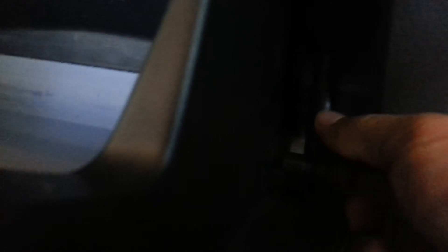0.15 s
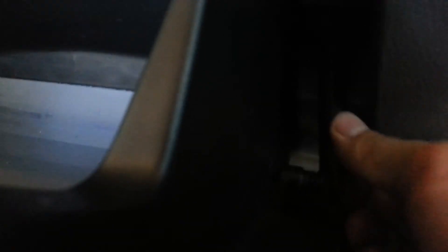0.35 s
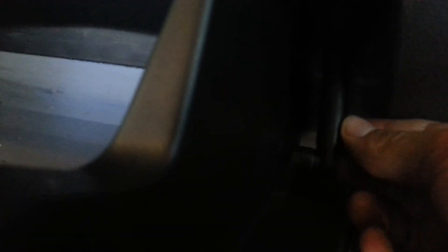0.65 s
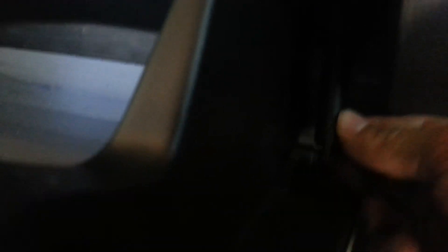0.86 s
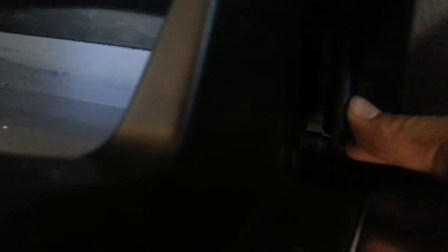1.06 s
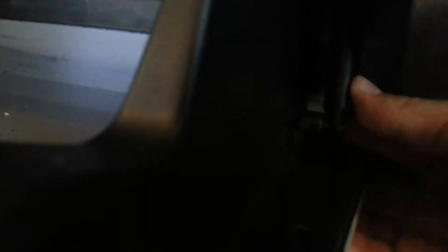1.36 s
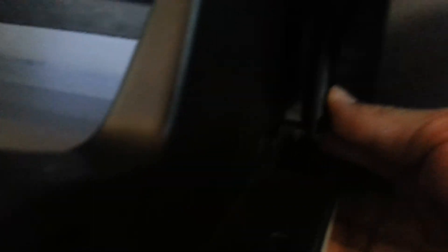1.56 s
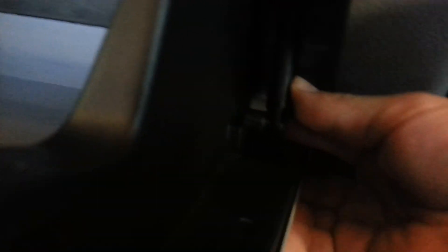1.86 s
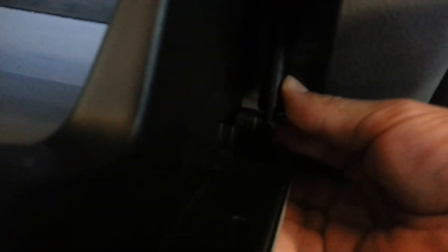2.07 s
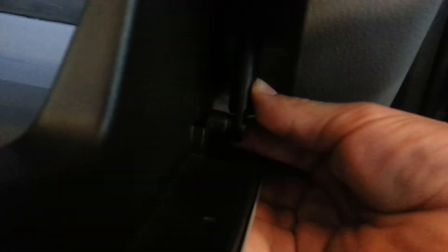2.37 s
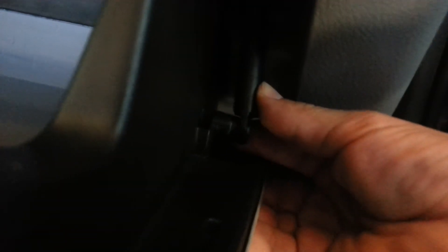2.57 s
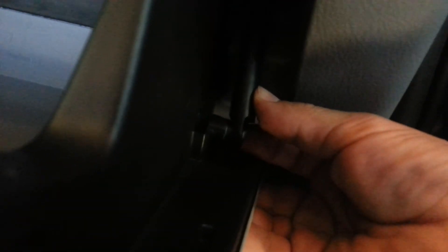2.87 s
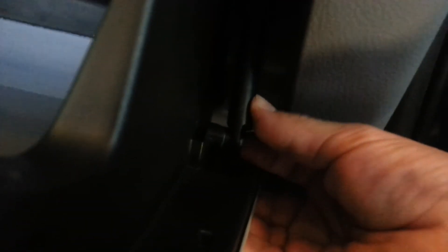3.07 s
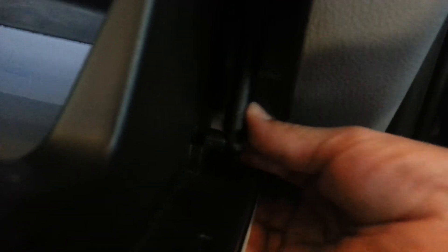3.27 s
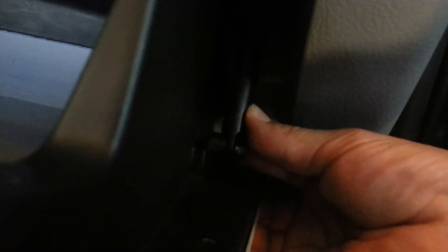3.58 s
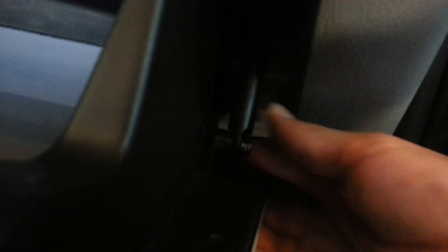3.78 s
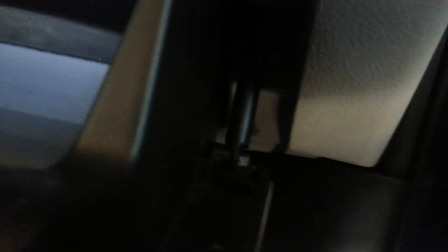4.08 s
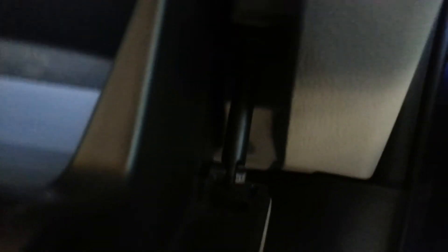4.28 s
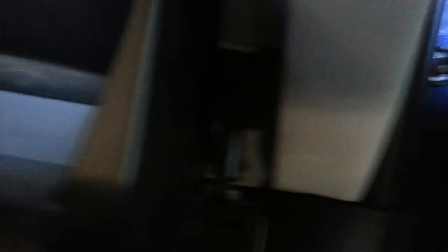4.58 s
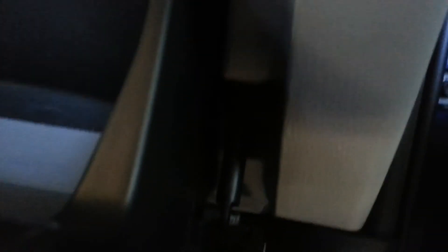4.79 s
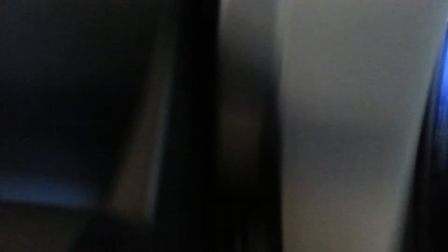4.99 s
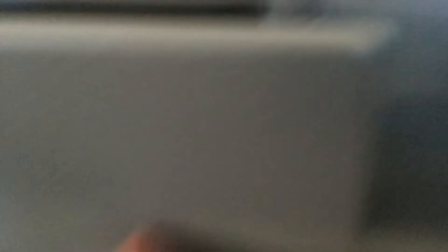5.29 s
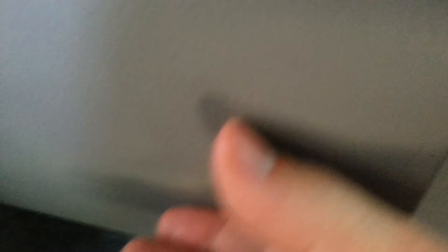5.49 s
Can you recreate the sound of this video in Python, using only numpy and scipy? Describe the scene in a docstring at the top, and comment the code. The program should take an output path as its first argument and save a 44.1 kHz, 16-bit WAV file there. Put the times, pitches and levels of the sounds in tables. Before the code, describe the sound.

Close plastic scrapes and small taps in a quiet parked car, one crisp click, then a booming, overloaded clunk as a bin seats.

```python
"""Glove box refitted in a parked car

A plastic glove box is worked back up into the dash of a quiet car, close to the microphone.
The bin scrapes and slides (hails of tiny stick-slip contacts) and rattles; its arm snaps on sharply.
Contacts ring decaying modes and filtered panel noise; the catch's double knock booms through the dash
and overloads the recorder, then loose parts buzz. Behind lie filtered-noise rumble and hiss,
with a swept sine hum and a few faint chirps."""
import sys
import numpy as np
from scipy import signal
from scipy.fft import rfft, irfft
from scipy.io import wavfile
from scipy.ndimage import uniform_filter1d

SR = 44100
rng = np.random.default_rng(int(sys.argv[2]) if len(sys.argv) > 2 else 0)


def store_wav(level_fs):
    """Save 16-bit WAV to argv[1]."""
    pcm = np.round(np.clip(np.atleast_2d(level_fs), -1, 1) * 32767)
    wavfile.write(sys.argv[1], SR, pcm.T.astype(np.int16))


N = 248724  # length in samples

# Cabin rumble and microphone hiss. Each row: frequency in Hz, relative level in dB per Hz.
FLOOR_COLOUR = [(15, -55.5), (25, -28), (41, -16), (108, -2), (141, -8), (246, -5.5), (377, -12),
                (443, -13.5), (533, -14), (660, -15), (4360, -26.5), (5400, -21.5), (7230, -27),
                (14400, -28)]
FLOOR_DB = -58
# Stereo width of the floor, then of the plastic. Each row: frequency in Hz, left-right correlation.
FLOOR_LIKENESS = [(40, 0.83), (150, 0.2), (600, 0.26), (2000, 0.05), (12000, .1)]
PLASTIC_LIKENESS = [(40, .4), (120, 0.13), (300, 0.99), (600, 0.53), (1500, 0), (12000, 0)]

# A faint low hum, like an engine gathering speed outside. Each row: time in seconds, pitch in Hz.
HUM_PITCH = [(1.8, 56.1), (2.36, 56.0), (3.94, 71.44), (4.36, 66.2), (5.4, 79.7), (5.64, 95.6)]
HUM_DB, HUM_OCTAVE_DB = -64, -73
# The fundamental only comes through once it climbs above this edge.
HUM_LOW_CUT_HZ, HUM_LOW_CUT_SLOPE = 64, 14
# Faint far chirps. Each row: start in seconds, length in seconds, start pitch in Hz, end pitch in Hz,
# level at the crest in dB.
CHIRPS = [(.39, .05, 5900, 6500, -71), (1.825, .075, 6200, 6900, -70), (3.76, .13, 1430, 1410, -70),
          (4.87, .09, 1550, 1480, -66), (5.46, .17, 1390, 1340, -70)]

# Plastic drags on plastic, lightly, then biting.
# Each row: start of the hold in seconds, hold in seconds, level in dB.
SCRAPES = [(.43, .15, -59.5), (.503, 0.036, -40.5)]
SCRAPE_SWELL_DB_PER_S, SCRAPE_FADE_DB_PER_S = 518, 620
# The hand pushes the bin along its guides.
# Each row: start of the hold in seconds, hold in seconds, level in dB.
PUSHES = [(0.01, 0.067, -54.5), (1.04, 0.29, -66), (2.79, 0.087, -54), (3.24, 0.98, -59), (4.2, .2, -46.5),
          (4.255, 0.011, -36), (4.41, 0.014, -39.5), (4.66, .32, -56)]
PUSH_SWELL_DB_PER_S, PUSH_FADE_DB_PER_S = 211, 151
# Loose parts are shaken by the catch and buzz until they come to rest.
SHUDDER_DB, SHUDDER_HOLD_S = -25, .035
SHUDDER_SWELL_DB_PER_S, SHUDDER_FADE_DB_PER_S = 5002, 139
# Colour of the rubbing and buzzing. Each row: frequency in Hz, relative level in dB per Hz.
SCRAPE_COLOUR = [(60, -25), (160, 0), (300, -3), (500, -8), (680, 2.5), (1040, -6), (1310, 5), (1600, -7.5),
                 (2210, -2), (3250, -13), (9000, -18.5), (14000, -28)]
SLIDE_COLOUR = [(60, -25), (120, -16), (206, 0), (320, -11), (437, -9), (536, -17), (658, -9), (790, -21),
                (1250, -19), (1550, -14), (2000, -22), (3300, -22), (6000, -34), (14000, -52)]
SHUDDER_COLOUR = [(40, -22), (65, -4), (130, -8), (260, 0), (600, -10), (830, -17), (1000, -13),
                  (1280, -21), (1570, -16), (2200, -20), (4500, -20), (6300, -29), (9000, -42),
                  (14000, -55)]

# Light touches of the loose bin. Each row: time in seconds, relative level in dB,
# treble edge of the contact in Hz, bass weight in dB, favoured frequency in Hz, left-minus-right pan in dB.
RATTLES = [(0.004, -34, 1520, 18, 330, -3.5), (0.045, -34, 785, 10.5, 380, -1),
           (0.271, -47.5, 5300, 10, 3330, -9), (0.461, -36, 3200, 9, 800, -1),
           (0.509, -39, 3500, 14.5, 1280, -9), (0.540, -34.5, 5000, 9, 1274, -1),
           (2.568, -49, 6000, -4, 4100, -10.5), (2.884, -34, 780, 7, 598, -5),
           (2.924, -38, 5000, -12, 4250, 4), (3.235, -33.5, 3650, 8.5, 1320, -6),
           (3.316, -42.5, 6270, 12.5, 2620, -5), (3.405, -42, 1900, 20.5, 496, -1),
           (3.469, -26.5, 1060, 5, 566, -4), (3.9678, -13, 3100, 6, 620, -5),
           (3.989, -16.5, 298, 5, 156, -3), (4.254, -25, 1000, 7.5, 206, -6.5),
           (4.298, -26.5, 480, 3.5, 211, -5.5), (4.689, -28.5, 2400, 15.5, 403, -0.5),
           (4.708, -32, 2980, 16, 3200, -1.5), (4.756, -39, 6930, -22, 5010, -13),
           (4.825, -30.5, 3200, 12.5, 407, 3), (4.848, -40.5, 2840, 18, 2180, -3),
           (4.873, -36.5, 2500, 13.5, 400, 2), (4.969, -36, 3090, 19.5, 3300, -1.5)]
# The arm snaps onto its peg. Each row: time in seconds, relative level in dB,
# treble edge in Hz, bass weight in dB, favoured frequency in Hz, left-minus-right pan in dB.
SNAP = [(2.7632, -17, 2500, -5.5, 1500, -1.5), (2.7643, 3.5, 9900, -6.5, 1920, -4),
        (2.7673, -12, 3000, 3.5, 380, -4)]
# The catch rides over its stop, the bin lands against the dash and rebounds softly.
# Each row: time in seconds, relative level in dB, treble edge in Hz, bass weight in dB,
# favoured frequency in Hz, left-minus-right pan in dB.
CATCH = [(4.4298, 19.5, 12000, -3, 3000, 0.75), (4.4348, 1.5, 1460, -3.5, 350, 0.068),
         (4.4523, 8.5, 14000, -3, 3500, 0.31), (4.4620, 10.5, 1500, 2.5, 250, -2.5),
         (4.531, -18, 500, 4, 330, -2)]
# Crowded modes of the plastic panels. Each row: frequency in Hz, relative level in dB per Hz.
PANEL_COLOUR = [(60, -31.5), (160, -8), (400, -2.5), (850, -3), (1400, -2.5), (2500, -5), (4500, -8.5),
                (8000, -24.5), (11000, -25.5), (15000, -22.5)]
# How long the panels ring. Each row: frequency in Hz, time to fall 60 dB in seconds.
PANEL_T60 = [(100, 0.31), (400, 0.11), (1200, 0.049), (4000, 0.04), (12000, 0.043)]
# The hanging bin. Each row: frequency in Hz, relative level in dB, time to fall 60 dB in seconds.
BIN_MODES = [(120, -34, .22), (159, -23.5, .22), (226, -25, .16), (260, -24, 0.32), (357, -14.5, 0.097),
             (413, -25, .1), (494, -25, .09), (629.6, -13, 0.1), (990, -21, .05), (1190, -9, 0.033),
             (1450, -5.5, 0.036), (2280, -6.5, .025), (2705, -7, 0.02)]
# The dash with the bin seated in it.
# Each row: frequency in Hz, relative level in dB, time to fall 60 dB in seconds.
DASH_MODES = [(38, -37, .15), (65, -35.5, 0.27), (117, -33, 0.22), (151, -20.5, 0.097), (194.3, -24, .16),
              (251.6, -6.5, 0.14), (358.4, -18, 0.33), (372.1, -4, .135), (462, -21.5, 0.11),
              (584, -15.5, .12), (617.6, -16, 0.08)]

CUTOFF_HZ = 14900  # top of the recorder's band


def from_db(db):
    """Decibels to gain."""
    return 10 ** (np.asarray(db) / 20)


def rms_one(x):
    """Scale to unit power."""
    return x / np.sqrt(np.mean(x ** 2) + 1e-20)


def in_time(rows):
    """A curve read at every sample."""
    return np.interp(np.arange(N) / SR, *np.transpose(rows))


def at_hz(points, hz):
    """A table read on a log-frequency axis."""
    table_hz, value = np.transpose(points)
    return np.interp(np.log(np.maximum(hz, 1)), np.log(table_hz), value)


def stereo(pair, alike):
    """Two unrelated noises become left and right with a given correlation."""
    middle = np.sqrt((1 + alike) / 2) * pair[0]
    side = np.sqrt((1 - alike) / 2) * pair[1]
    return middle + side * [[1], [-1]]


def coloured(noise, spectrum, likeness):
    """Give a pair of noises a spectrum and a left-right correlation; unit power."""
    hz = np.arange(N // 2 + 1) * SR / N
    pair = stereo(rfft(noise), at_hz(likeness, hz))
    return rms_one(irfft(pair * from_db(at_hz(spectrum, hz)), N))


def fade(energy, t60):
    """Stored energy leaks away by 60 dB in t60 seconds."""
    return signal.lfilter([1], [1, -np.exp(-np.log(1e6) / (t60 * SR))], energy)


def background(whine_hz, whine_width_hz, whine_db):
    """A steady low rumble, even hiss, and a narrow band of high hiss."""
    hz = np.arange(N // 2 + 1) * SR / N
    floor = from_db(FLOOR_DB) * coloured(rng.standard_normal((2, N)), FLOOR_COLOUR, FLOOR_LIKENESS)
    peak = 1 / (1 + (2 * (hz - whine_hz) / whine_width_hz) ** 2)
    whine = irfft(rfft(rng.standard_normal((2, N))) * peak, N)
    return floor + from_db(whine_db) * rms_one(whine)


def hum():
    """A gliding low tone with its octave; the fundamental is weak below the low-cut edge."""
    hz = in_time(HUM_PITCH)
    phase = 2 * np.pi * np.cumsum(hz) / SR
    passed = 1 / np.hypot(1, (HUM_LOW_CUT_HZ / hz) ** HUM_LOW_CUT_SLOPE)
    return from_db(HUM_DB) * passed * np.sin(phase) + from_db(HUM_OCTAVE_DB) * np.sin(2 * phase)


def chirps(waver_depth):
    """Short gliding tones with an unsteady pitch, each swelling and fading."""
    out = 0
    for start, length, from_hz, to_hz, level_db in CHIRPS:
        along = np.clip((np.arange(N) / SR - start) / length, 0, 1)
        waver = 1 + waver_depth * rms_one(uniform_filter1d(rng.standard_normal(N), size=200))
        pitch = (from_hz + (to_hz - from_hz) * along) * waver
        tone = np.sin(2 * np.pi * np.cumsum(pitch) / SR)
        out = out + from_db(level_db) * np.sin(np.pi * along) * tone
    return out


def outside(chirp_waver):
    """The hum and chirps together; root two turns their RMS levels into sine peaks."""
    return np.sqrt(2) * (hum() + chirps(chirp_waver))


def strokes(rows, swell_db_per_s, fade_db_per_s):
    """Each stroke swells, holds and fades; the strongest sets the level in dB."""
    t = np.arange(N) / SR
    levels = []
    for start, hold, level_db in rows:
        before = np.maximum(start - t, 0)
        after = np.maximum(t - start - hold, 0)
        levels.append(level_db - swell_db_per_s * before - fade_db_per_s * after)
    return np.max(levels, axis=0).clip(-200)


def slips(level_db, colour, per_s, spread_db, slip_t60):
    """Stick and slip: a hail of tiny uneven contacts rings in the plastic."""
    born = rng.random(N) < per_s / SR
    sizes = from_db(spread_db * rng.standard_normal(N))
    energy = fade(born * sizes ** 2 + 1e-18, slip_t60)
    grains = np.sqrt(energy) * rng.standard_normal((2, N))
    return coloured(grains, colour, PLASTIC_LIKENESS) * from_db(level_db)


def rubbing():
    """The bin scrapes briefly, then slides up its guides and shudders as it settles."""
    scrape_db = strokes(SCRAPES, SCRAPE_SWELL_DB_PER_S, SCRAPE_FADE_DB_PER_S)
    slide_db = strokes(PUSHES, PUSH_SWELL_DB_PER_S, PUSH_FADE_DB_PER_S)
    catch_stroke = (CATCH[0][0], SHUDDER_HOLD_S, SHUDDER_DB)
    shudder_db = strokes([catch_stroke], SHUDDER_SWELL_DB_PER_S, SHUDDER_FADE_DB_PER_S)
    scrape = slips(scrape_db, SCRAPE_COLOUR, per_s=1400, spread_db=2, slip_t60=.02)
    slide = slips(slide_db, SLIDE_COLOUR, per_s=1200, spread_db=2.5, slip_t60=.035)
    shudder = slips(shudder_db, SHUDDER_COLOUR, per_s=600, spread_db=2.5, slip_t60=.03)
    return (scrape + slide + shudder) * from_db([[-1.2], [1.2]])  # leans right


def loose_parts(gain_db, t60_at_1k, shortening):
    """The small part that is touched rings briefly at its own note; high notes die sooner."""
    out, t = np.zeros((2, N)), np.arange(SR // 4) / SR
    for s, level_db, _, _, hz, pan_db in RATTLES:
        t60 = t60_at_1k * (1000 / hz) ** shortening
        start = round(s * SR)
        note = np.sin(2 * np.pi * hz * t) * np.exp(-np.log(1000) * t / t60)
        side_db = pan_db * np.array([[.5], [-.5]])
        out[:, start:start + len(t)] += from_db(level_db + gain_db + side_db) * note
    return out


def clicks(times, sizes):
    """Single-sample impulses, one row of sizes per channel."""
    out = np.zeros((2, N))
    out[:, np.round(times * SR).astype(int)] = sizes
    return out + 1e-18


def force(contacts, hz, bass_hz=550, favour_db=3.0, favour_octaves=0.4):
    """Contact strength at one frequency: soft lacks treble, heavy adds bass, the spot favours some modes."""
    s, level_db, edge_hz, weight_db, favoured_hz, pan_db = np.transpose(contacts)
    favour = favour_db * np.exp(-(np.log2(hz / favoured_hz) / favour_octaves) ** 2)
    bass = weight_db / (1 + (hz / bass_hz) ** 2)
    softness = np.hypot(1, (hz / edge_hz) ** 3)
    size = from_db(level_db + favour + bass) / softness
    return clicks(s, size * from_db(np.outer([.5, -.5], pan_db)))


def through_bands(drive):
    """Half-octave band-passes, each fed with noise whose strength in time is drive(Hz)."""
    edges = 44 * 2 ** np.arange(0, 8.6, .5)
    white, out = rng.standard_normal((2, 2, N)), 0
    for k, (low, high) in enumerate(zip(edges, edges[1:])):
        hz = np.sqrt(low * high)
        band = signal.butter(2, [low, high], "band", fs=SR, output="sos")
        noise = stereo(white[k % 2], at_hz(PLASTIC_LIKENESS, hz))  # neighbours use separate noises
        out = out + signal.sosfilt(band, noise * drive(hz))
    return out


def panels(contacts, crack_db, crack_t60, cabin_db, cabin_t60):
    """The crowded upper modes: a brief crack, a short ring and a faint tail in the padded cabin."""
    def drive(hz):
        """Noise strength from the energy stored at one frequency."""
        energy = force(contacts, hz) ** 2
        treble = 1 / (1 + (900 / hz) ** 2)  # the crack is mostly treble
        crack = from_db(crack_db) ** 2 * treble * fade(energy, crack_t60)
        panel_ring = fade(energy, at_hz(PANEL_T60, hz))
        cabin = from_db(cabin_db) ** 2 * fade(energy, cabin_t60)
        return from_db(at_hz(PANEL_COLOUR, hz)) * np.sqrt(crack + panel_ring + cabin)
    return through_bands(drive)


def without_boom(x):
    """Bin and panels are too small to radiate deep bass."""
    return signal.sosfilt(signal.butter(4, 115, "high", fs=SR, output="sos"), x)


def ring(contacts, modes, gain_db, low_cut_hz, top_hz, phase_gap):
    """Every contact sets the modes ringing; left and right hear them out of step by phase_gap radians."""
    out = 0
    for hz, level_db, t60 in modes:
        pole = np.exp(-np.log(1000) / (t60 * SR) + 2j * np.pi * hz / SR)
        mode = signal.lfilter([1], [1, -pole], force(contacts, hz))
        out = out + from_db(level_db + gain_db) * mode
    heard = np.imag(out * np.exp(1j * phase_gap * np.array([[-.5], [.5]])))
    band = signal.butter(2, [low_cut_hz, top_hz], "band", fs=SR, output="sos")
    return signal.sosfilt(band, heard)


def scene():
    """All contacts share the panels; the catch also shakes the dash."""
    quiet = background(whine_hz=5400, whine_width_hz=600, whine_db=-66.5)
    far = outside(chirp_waver=0.0217)
    rubs = rubbing()
    notes = loose_parts(gain_db=-12, t60_at_1k=.05, shortening=.45)
    clatter = panels(RATTLES + SNAP + CATCH, crack_db=5, crack_t60=0.0066, cabin_db=-33.5, cabin_t60=.25)
    bin_ring = ring(RATTLES + SNAP, BIN_MODES, gain_db=-8.5, low_cut_hz=87, top_hz=3400, phase_gap=0.98)
    dash_ring = ring(CATCH, DASH_MODES, gain_db=-6.5, low_cut_hz=96, top_hz=2500, phase_gap=0.98)
    return quiet + far + rubs + without_boom(notes + clatter + bin_ring) + dash_ring


def record(dry):
    """The converter clips at full scale and the top is cut."""
    clipped = np.clip(dry, -1, 1)
    return signal.sosfiltfilt(signal.butter(16, CUTOFF_HZ, fs=SR, output="sos"), clipped)


dry = scene()
out = record(dry)
store_wav(out)
```